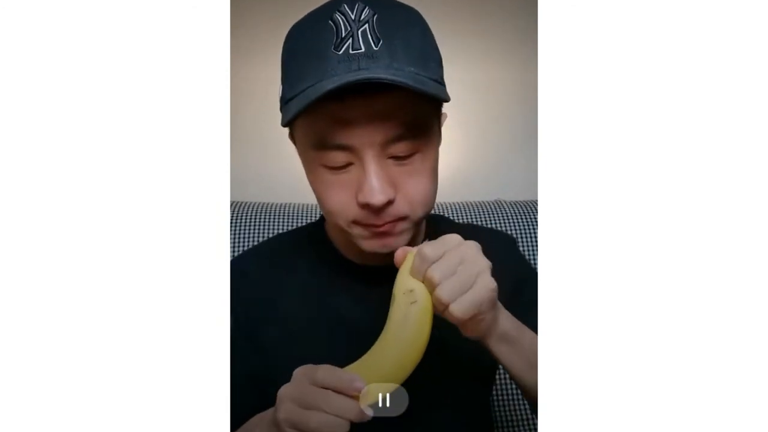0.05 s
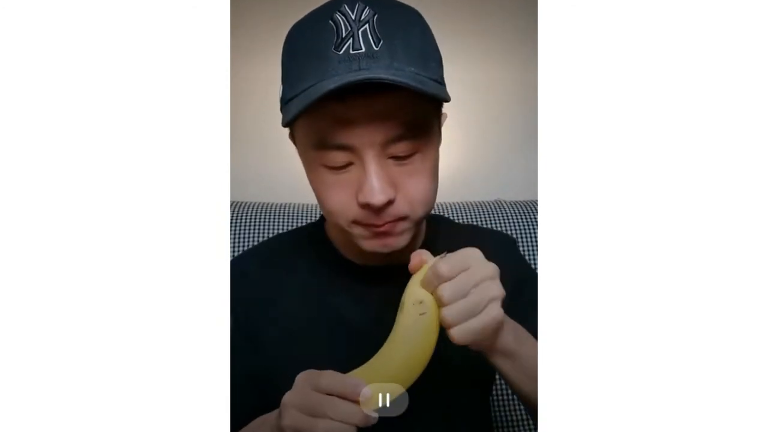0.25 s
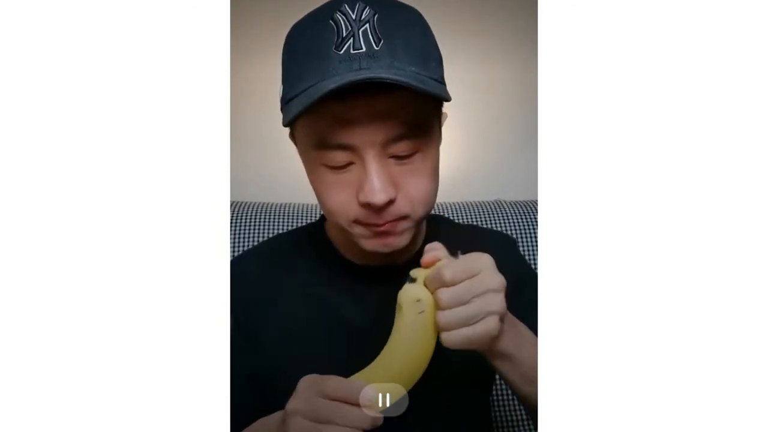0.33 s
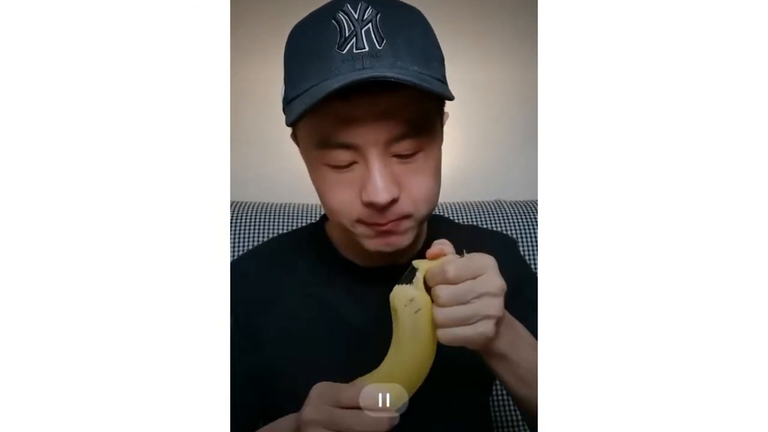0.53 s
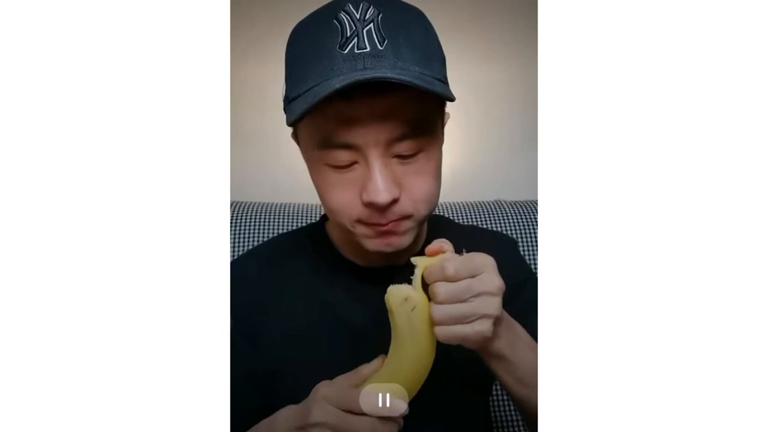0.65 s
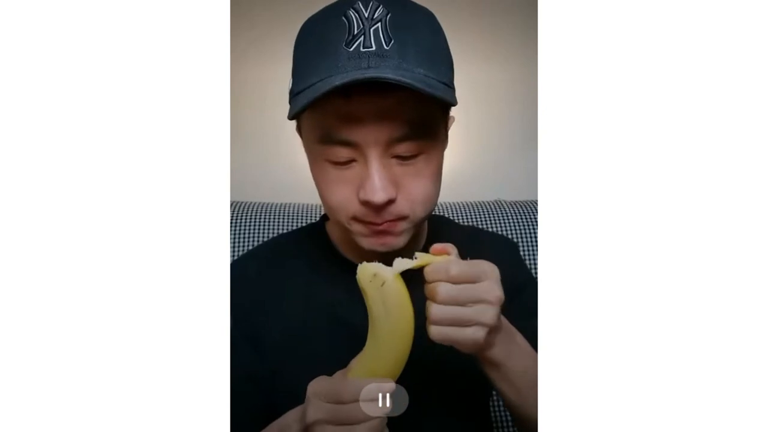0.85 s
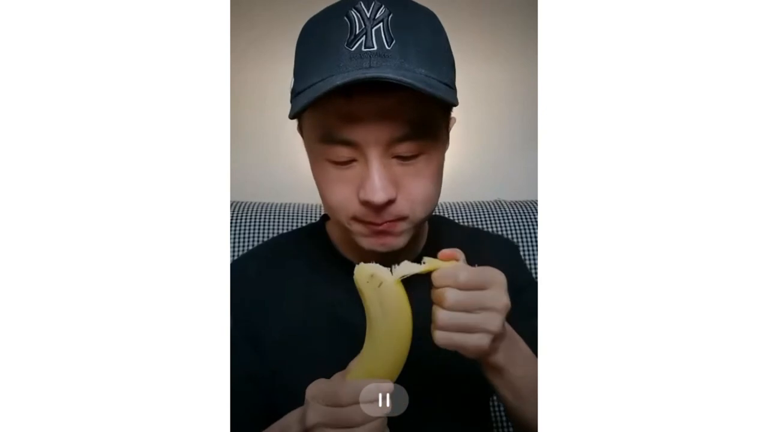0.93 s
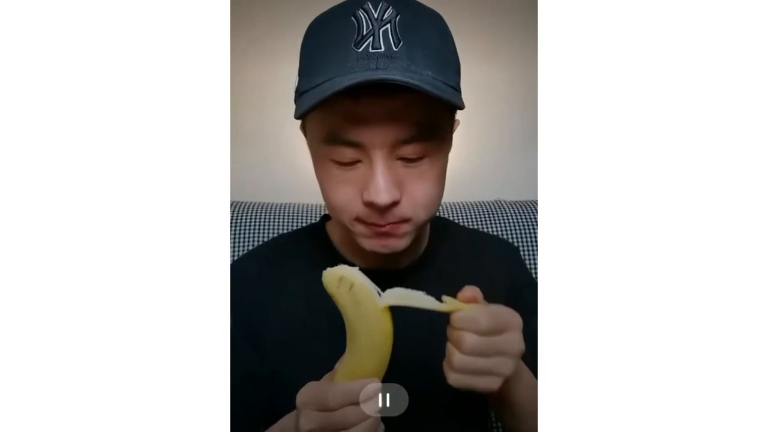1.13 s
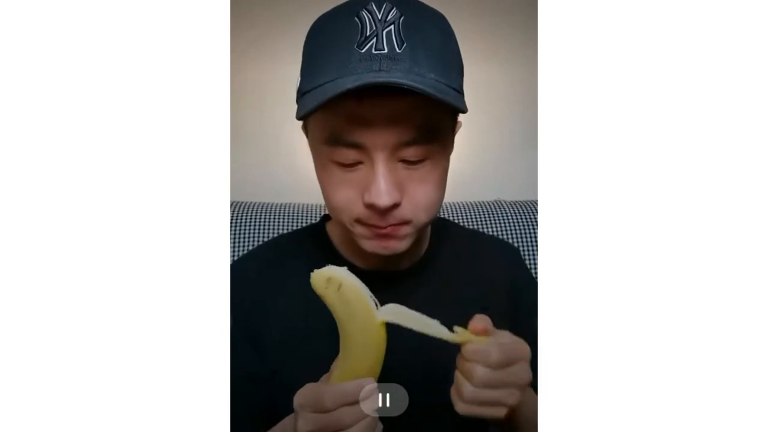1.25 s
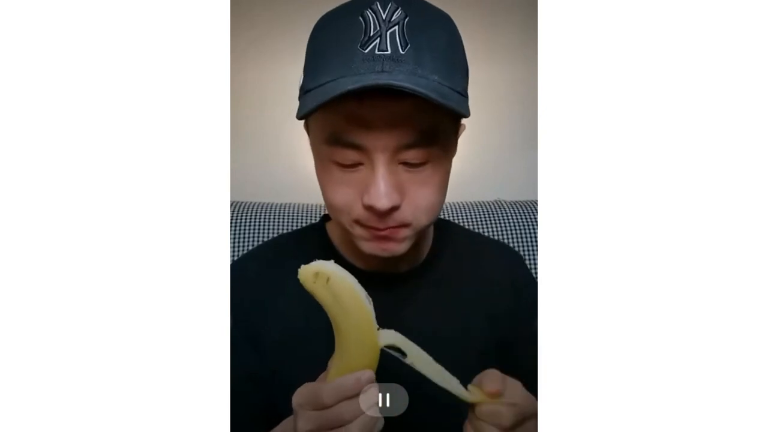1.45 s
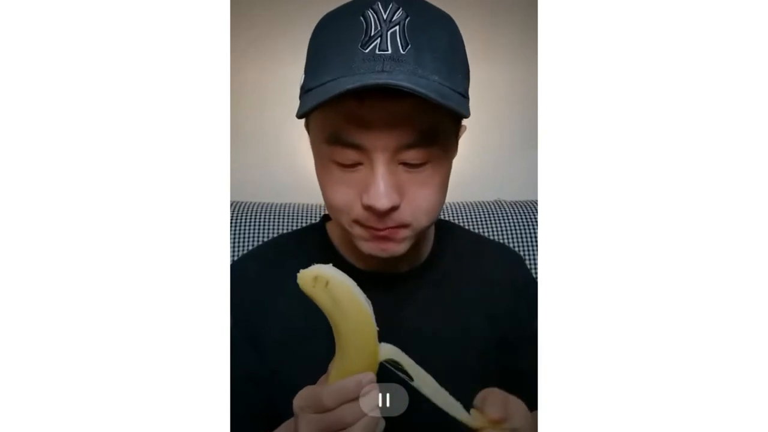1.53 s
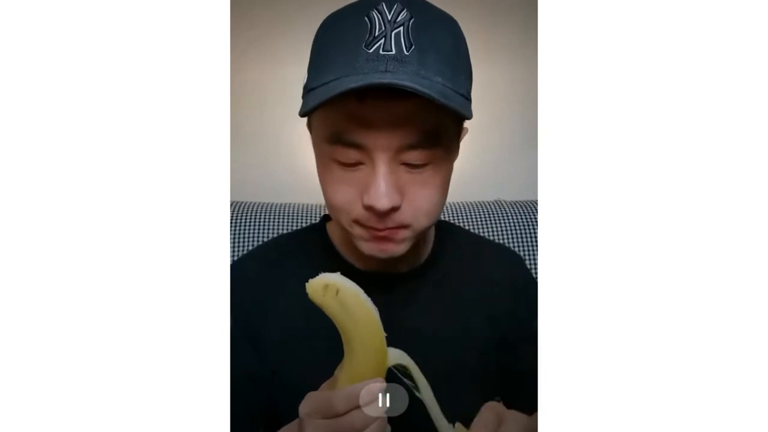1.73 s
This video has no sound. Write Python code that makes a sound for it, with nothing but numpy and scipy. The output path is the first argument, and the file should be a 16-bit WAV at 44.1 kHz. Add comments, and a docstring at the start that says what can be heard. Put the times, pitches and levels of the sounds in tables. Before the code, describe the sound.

A banana is peeled close to the microphone in a small room with a faint hum. Hands rustle, and the stem snaps at about 0.25 seconds. Fibres tick apart among soft low bumps until 0.7 seconds, when the peel lifts with a sizzle. From 0.9 to 1.5 seconds one strip rips with a dense, brightening crackle, ending in a thin hiss. A sleeve brushes near 1.8 seconds.

```python
"""A banana peeled close to the microphone, in a small quiet room with a faint hum.
The hands rustle, the stem snaps, and the tough fibres of the neck tick apart among soft low bumps.
The peel lifts with a sizzle; from about 0.9 s a strip rips down the fruit, a dense crackle of tiny
breaks that rings the loose flap. The rip runs out in a thin hiss, the strip slides, a sleeve brushes."""
import sys
import numpy as np
from scipy import signal
from scipy.fft import rfft, irfft
from scipy.io import wavfile

SR = 44100
rng = np.random.default_rng(int(sys.argv[2]) if len(sys.argv) > 2 else 0)


def master(y):
    """Save y as 16-bit WAV."""
    cut = np.clip(np.atleast_2d(y).T, -1, 1)
    pcm = np.round(cut * 32767)  # scale
    wavfile.write(sys.argv[1], SR, pcm.astype(np.int16))


N = 79380

# Tone of the room's air. Each row: frequency in Hz, relative level in dB.
AIR_TONE = [(60, 27.5), (150, -3.5), (350, -63), (600, -78), (2000, -63), (8000, -0.5), (16000, -32.5)]
# Rustle of the hands, and the sleeve's last brush. Each row: time in seconds, level in dB.
RUSTLE_LEVEL = [(0, -44), (.07, -55.5), (.22, -57.5), (.26, -40), (.4, -59), (.51, -41.5), (.58, -61.5),
                (.65, -32.5), (.8, -74), (.93, -47), (1.13, -45.5), (1.2, -59), (1.5, -57.5), (1.65, -39.5),
                (1.74, -40), (1.8, -40.5)]
BRUSH_LEVEL = [(1.745, -71), (1.763, -32.5), (1.778, -32), (1.8, -61)]
# Tones of that rustle and brush. Each row: frequency in Hz, relative level in dB.
RUSTLE_TONE = [(40, -8), (140, 8.5), (250, -3), (370, -1.5), (520, -17), (1300, -20.5), (2800, -26),
               (16000, -31.5)]
BRUSH_TONE = [(100, -25), (350, -3), (1500, -4.5), (2200, -23), (4000, -29), (16000, -29)]
# The fruit knocks in the hands. Each row: start in seconds, level in dB, pitch in Hz, rise in seconds.
HAND_BUMPS = [(0.253, -22, 116, 0.0023), (.249, -35.5, 647, 0.004), (0.253, -39, 51.6, 0.035),
              (0.505, -36.5, 100, 0.015), (.541, -23, 49.6, 0.0089), (0.621, -23.5, 61, 0.007),
              (0.64, -29.5, 289.5, 0.0042), (0.659, -26, 23.1, .03), (1.232, -36, 50, 0.0086)]
# The stem cracks. Each row: start in seconds, hold in seconds, level in dB.
STEM_CRACKS = [(0.2361, 0.0023, -15), (0.2461, 0.0026, -8.5), (0.2502, 0.003, -21), (0.2595, 0.0036, -22.5),
               (0.272, 0.003, -29), (0.282, 0.005, -26)]
# Body of the stem. Each row: frequency in Hz, relative level in dB.
STEM_TONE = [(200, -23), (600, -17), (850, -29), (1600, -5), (1950, -8.5), (2450, 4), (3200, -8),
             (4600, -2), (6600, 0), (8500, -11), (16000, -11)]
# Single tough fibres part. Each row: start in seconds, level in dB, pitch in Hz.
FIBRE_TICKS = [(0.439, -16, 7200), (.4893, -2.5, 6200), (0.5055, -6, 5760), (0.5227, -10, 6370),
               (0.7485, -20.5, 5920)]
# The neck tears, and its last fibres rasp. Each row: time in seconds, level in dB.
TEAR_LEVEL = [(.228, -70), (.238, -25.5), (.285, -31), (.32, -45), (.415, -60.5), (.44, -36.5), (.478, -90),
              (.49, -35.5), (.53, -34), (.56, -92), (.61, -40), (.66, -62), (.72, -41)]
RASP_LEVEL = [(.49, -42), (.54, -39.5), (.582, -38.5), (.605, -54)]
# Tones of the neck's tear, splinters and rasp. Each row: frequency in Hz, relative level in dB.
TEAR_TONE = [(200, -31), (900, -61), (1800, 11.5), (3000, 13), (3800, 18), (6700, 12.5), (8500, 13.5),
             (12000, 7.5), (16000, 2)]
SPLINTER_TONE = [(200, -13), (1700, -1), (3300, 0), (5800, 7.5), (8000, -1), (16000, 3.5)]
NECK_RASP_TONE = [(2200, -27), (3650, 5.5), (4500, -22), (5700, 7), (7200, 9), (8800, -33)]
# The peel lifts, rips, then runs out and slides. Each row: time in seconds, level in dB.
LIFT_LEVEL = [(.68, -98), (.725, -34), (.765, -44), (.8, -32.5), (.845, -35.5), (.89, -26.5), (.96, -34)]
RIP_LEVEL = [(.85, -81), (.895, -29.5), (.92, -21.5), (.96, -18.5), (.972, -24), (1.06, -24), (1.125, -20),
             (1.21, -22), (1.265, -16.5), (1.31, -21.5), (1.41, -16.5), (1.455, -20), (1.47, -25.5),
             (1.51, -37), (1.57, -109)]
RUN_OUT_LEVEL = [(1.47, -24), (1.572, -39), (1.588, -39.5), (1.596, -94), (1.655, -39.5), (1.74, -57)]
# Tones of the lift, early rip, late rip and run-out. Each row: frequency in Hz, relative level in dB.
LIFT_TONE = [(900, -103), (2200, -24), (3400, 4), (12000, 3.5), (16000, 2)]
EARLY_RIP_TONE = [(500, -37.5), (950, -22), (1250, -4), (1480, 1.5), (1780, 0.5), (2200, -11), (2700, -3.5),
                  (3600, -8.5), (5800, -2), (7500, -1.5), (8250, -10.5), (9150, -0.5), (11000, -4.5),
                  (15500, -7.5)]
LATE_RIP_TONE = [(550, -41), (1020, -37.5), (1280, -3), (1550, 1.5), (2200, -8.5), (3500, -5.5),
                 (6700, -1.5), (8500, -4.5), (9150, 3), (10800, 1.5), (12000, 3), (15500, -4)]
RUN_OUT_TONE = [(2000, -43), (5800, -1), (12000, 0.5)]
# Thicker strands pop in the rip. Each row: start in seconds, level in dB, hold in seconds.
STRAND_POPS = [(0.9187, -13, 0.0005), (.9535, -14, 0.0012), (0.9623, -12, 0.0005), (0.985, -15, 0.001),
               (1.063, -22, .001), (1.107, -15, 0.0025), (1.150, -15.5, 0.002), (1.348, -16, .002),
               (1.421, -15, 0.0015), (1.449, -19, 0.006)]
# Resonances of the loose flap. Each row: frequency in Hz, gain in dB.
FLAP_MODES = [(800, -14), (1400, 3), (1640, 3), (2550, 1.5)]
# Tone of the room's tail. Each row: frequency in Hz, relative level in dB.
TAIL_TONE = [(100, -20), (900, 0.5), (2000, 6), (6000, 2.5), (10000, 5.5), (16000, 5)]

AIR_DB, HUM_HZ, HUM_DB, HUM_WAVER_DB, HUM_WAVER_RAD = -56, 120, -57, 2.5, .6
THIN_FROM_S, THIN_BY_S = 1.14, 1.26  # the rip brightens as the strip runs down the fruit
FLAP_RING_S, FLAP_BEND, BENDS_PER_S = .0034, .07, 24
NEAR_DB, TAIL_DB, TAIL_T60_S = -11, -11.5, .25
TOP_HZ = 15650


def undb(db):
    """Decibels to gain."""
    return 10 ** (np.asarray(db) / 20)


def unit(x):
    """Scale to rms 1."""
    return x / np.sqrt(np.mean(x ** 2) + 1e-20)


def clock():
    """Time of each sample in seconds."""
    return np.arange(N) / SR


def curve(rows):
    """Gain along (s, dB) points, silent outside them."""
    s, db = np.array(rows).T
    return undb(np.interp(clock(), s, db)) * (clock() >= s[0]) * (clock() <= s[-1])


def colour(x, points):
    """Causal filter through (Hz, dB) points that keeps the power of white noise."""
    size = 4096
    hz, db = np.array(points).T
    bin_hz = np.arange(size // 2 + 1) * SR / size
    gain = unit(undb(np.interp(np.log(bin_hz + 1), np.log(hz), db)))
    cepstrum = irfft(np.log(gain))
    cepstrum[1:size // 2] *= 2  # fold to minimum phase
    cepstrum[size // 2 + 1:] = 0
    return signal.fftconvolve(x, irfft(np.exp(rfft(cepstrum))))[:N]


def wander(per_s):
    """Smooth random drift, rms 1."""
    return unit(np.interp(clock() * per_s, np.arange(N), rng.standard_normal(N)))


def crackle(per_s, spread_db):
    """Tiny clicks at random moments and of random size, rms 1."""
    hits = rng.random(N) < per_s / SR
    signs = rng.choice([-1, 1], N)
    sizes = undb(spread_db * np.clip(rng.standard_normal(N), -2, 2))
    return unit(hits * signs * sizes)


def burst(start, hold, release_s):
    """Envelope with an instant attack, a hold and an exponential release."""
    age = clock() - start
    return (age >= 0) * np.exp(-np.maximum(age - hold, 0) / release_s)


def ring(start, hz, rise_s):
    """A heavily damped swing whose envelope peaks after its rise time."""
    age = np.maximum(clock() - start, 0)
    return age / rise_s * np.exp(1 - age / rise_s) * np.sin(2 * np.pi * hz * age)


def room_tone():
    """Faint air all round the microphone, and a low hum that wavers in level and pitch."""
    hum = unit(np.sin(2 * np.pi * HUM_HZ * clock() + HUM_WAVER_RAD * wander(13)))
    air = undb(AIR_DB) * colour(rng.standard_normal(N), AIR_TONE)
    return air + hum * undb(HUM_DB + HUM_WAVER_DB * wander(13.16))


def hands():
    """Close up, cloth rustles, the fruit bumps as the grip gives, and the sleeve sticks and slips."""
    bumps = sum(undb(db) * ring(s, hz, rise) for s, db, hz, rise in HAND_BUMPS)
    rustle = curve(RUSTLE_LEVEL) * colour(crackle(per_s=6000, spread_db=11.4), RUSTLE_TONE)
    brush = curve(BRUSH_LEVEL) * colour(crackle(per_s=420, spread_db=2.1), BRUSH_TONE)
    return bumps + rustle + brush


def stem_snap():
    """Each crack is a short avalanche of breaking cells in the stiff stem."""
    force = sum(undb(db) * burst(s, hold, release_s=.0012) for s, hold, db in STEM_CRACKS)
    return colour(force * crackle(per_s=24000, spread_db=.35), STEM_TONE)


def neck_tear():
    """The neck tears slowly: its toughest fibres part with ringing ticks, the rest give with a rasp."""
    ticks = sum(undb(db) * ring(s, hz, rise_s=.0002) for s, db, hz in FIBRE_TICKS)
    splits = sum(undb(db - 6.5) * burst(s, 0, release_s=.0009) for s, db, hz in FIBRE_TICKS)
    breaks = crackle(per_s=6100, spread_db=4) * undb(2.2 * wander(290))
    tear = colour(curve(TEAR_LEVEL) * breaks, TEAR_TONE)
    rasp = colour(curve(RASP_LEVEL) * breaks, NECK_RASP_TONE)
    splinters = colour(splits * crackle(per_s=20000, spread_db=.47), SPLINTER_TONE)
    return ticks + splinters + tear + rasp


def peel_strip():
    """The peel lifts with a sizzle, rips in tiny breaks that tug the flap, and ends in a thin hiss."""
    fine = crackle(per_s=7000, spread_db=5.3)
    sizzle = curve(LIFT_LEVEL) * colour(fine, LIFT_TONE)
    hiss = curve(RUN_OUT_LEVEL) * colour(fine, RUN_OUT_TONE)
    grain = crackle(per_s=8000, spread_db=3.5)
    catching = undb(2.1 * wander(380))  # the tear front catches and slips
    pops = sum(undb(db) * burst(s, hold, release_s=.0008) for s, db, hold in STRAND_POPS)
    breaks = curve(RIP_LEVEL) * unit(grain * catching) + pops * crackle(per_s=30000, spread_db=.6)
    tugs = curve(RIP_LEVEL) * crackle(per_s=450, spread_db=2.5)
    thin = np.clip((clock() - THIN_FROM_S) / (THIN_BY_S - THIN_FROM_S), 0, 1)
    rip = (1 - thin) * colour(breaks, EARLY_RIP_TONE) + thin * colour(breaks, LATE_RIP_TONE)
    return sizzle + rip + loose_flap(tugs) + hiss


def loose_flap(tugs):
    """The loose peel rings briefly after every tug of the tear front; its pitch wanders as it bends."""
    pole = np.exp(-2 / (FLAP_RING_S * SR))
    ringing = 0
    for hz, db in FLAP_MODES:
        bent_hz = hz * (1 + FLAP_BEND * wander(BENDS_PER_S))
        carrier = np.exp(2j * np.pi * np.cumsum(bent_hz) / SR)
        # shift down, low-pass, shift back: a resonance that follows the pitch
        envelope = signal.lfilter([(1 - pole) ** 2], [1, -2 * pole, pole ** 2], tugs / carrier)
        ringing += 2 * undb(db) * np.real(carrier * envelope)
    return ringing


def small_room(direct):
    """The microphone gets the direct sound, quick reflections off body and hands, then a short tail."""
    t = clock()
    near = crackle(per_s=4000, spread_db=1.5) * burst(.001, 0, release_s=.006)
    decay = (t > .007) * np.exp(-np.log(1000) * t / TAIL_T60_S)
    tail = colour(rng.standard_normal(N) * decay, TAIL_TONE)
    response = (undb(NEAR_DB) * unit(near) + undb(TAIL_DB) * unit(tail)) / np.sqrt(N)
    return direct + signal.fftconvolve(direct, response)[:N]


def scene():
    """One microphone close to the fruit, with the room tone behind."""
    peeling = stem_snap() + neck_tear() + peel_strip() + hands()
    return (small_room(peeling) + room_tone())[None]


def record(dry):
    """The recorder rounds the highest peaks and cuts the top."""
    rounded = 1.592 * np.tanh(dry / 1.507)
    return signal.sosfilt(signal.ellip(10, .2, 80, TOP_HZ, fs=SR, output="sos"), rounded)


dry = scene()
out = record(dry)
master(out)
```